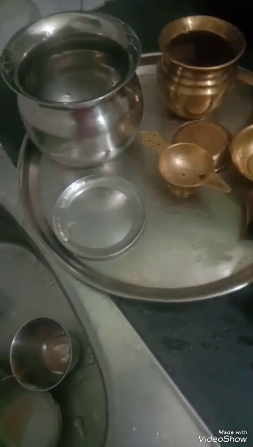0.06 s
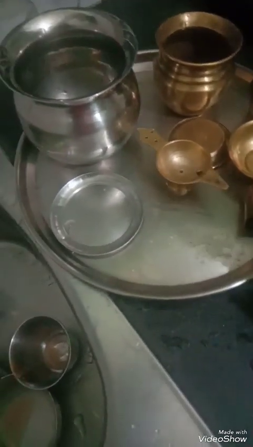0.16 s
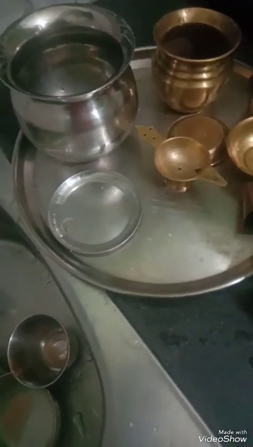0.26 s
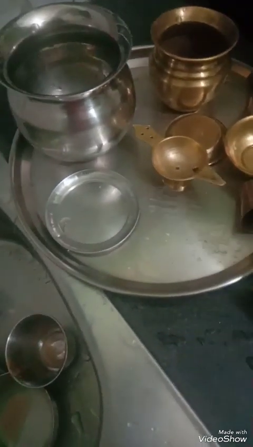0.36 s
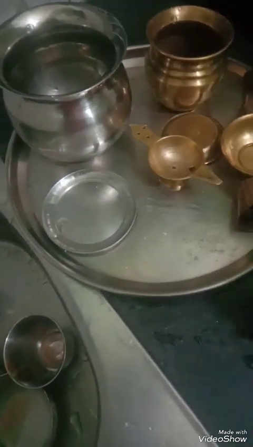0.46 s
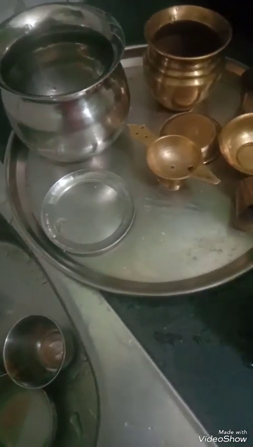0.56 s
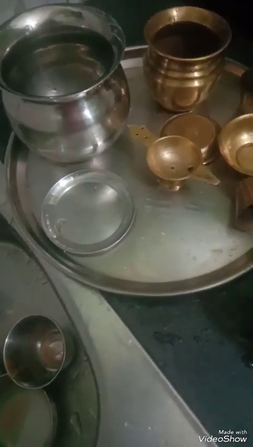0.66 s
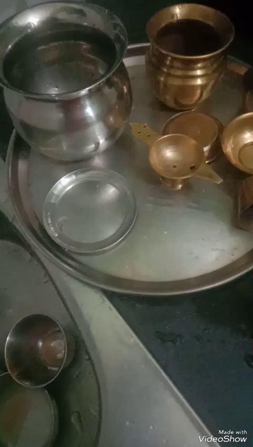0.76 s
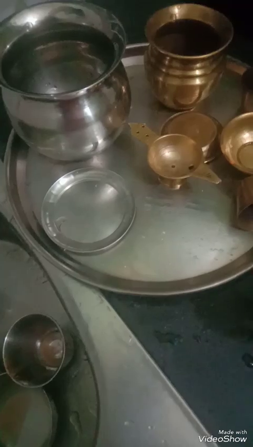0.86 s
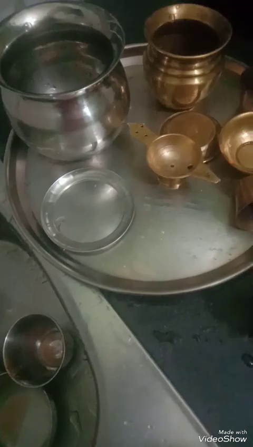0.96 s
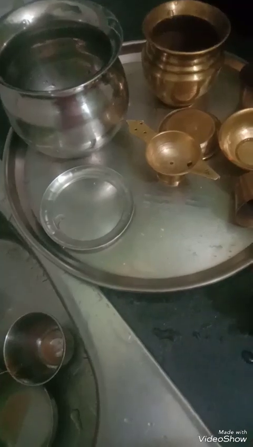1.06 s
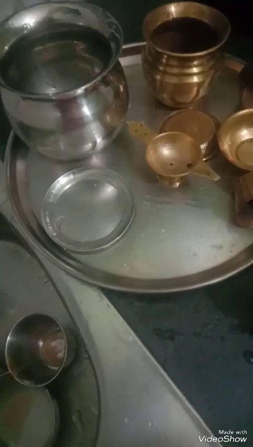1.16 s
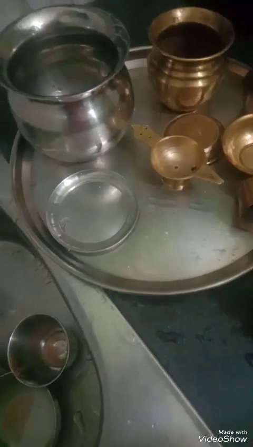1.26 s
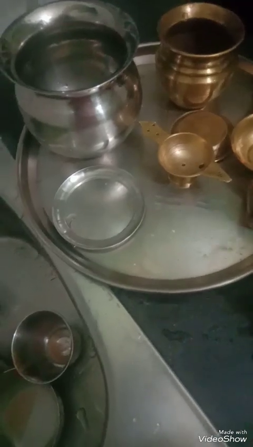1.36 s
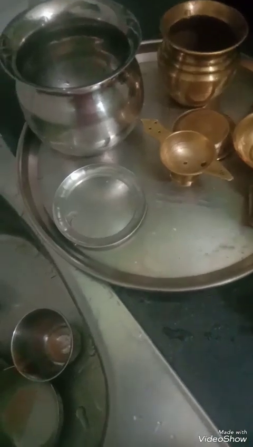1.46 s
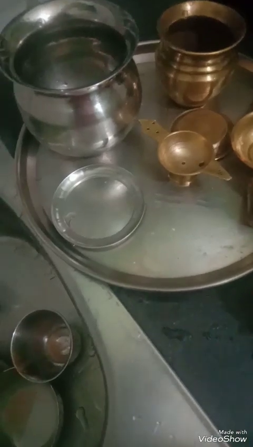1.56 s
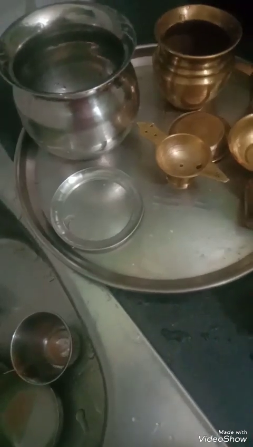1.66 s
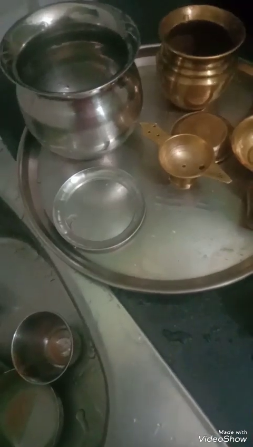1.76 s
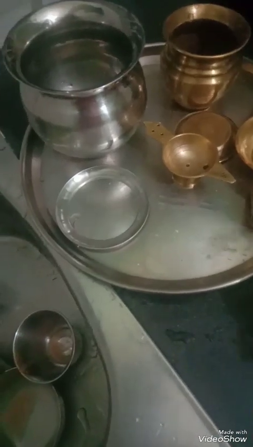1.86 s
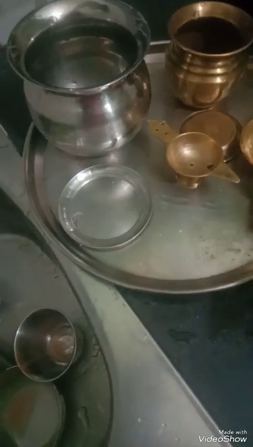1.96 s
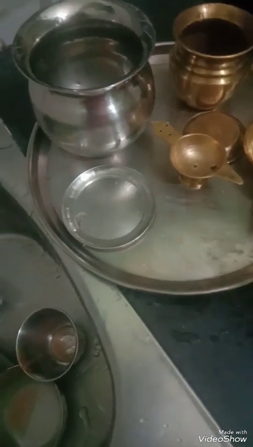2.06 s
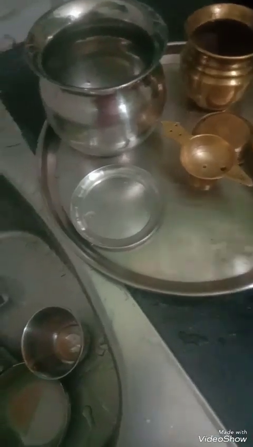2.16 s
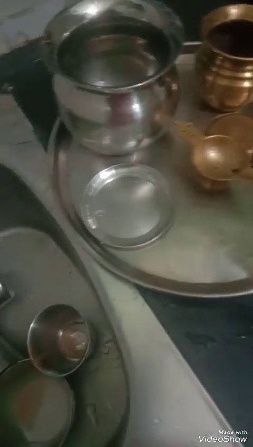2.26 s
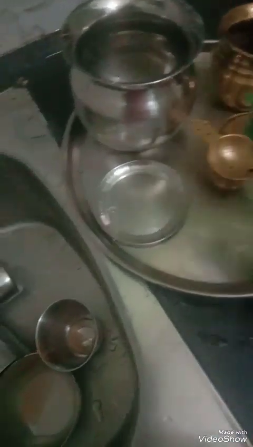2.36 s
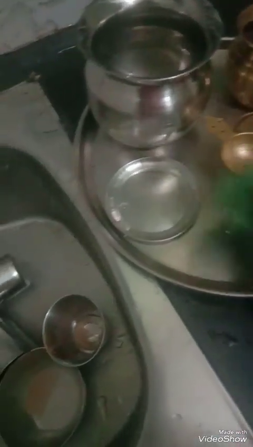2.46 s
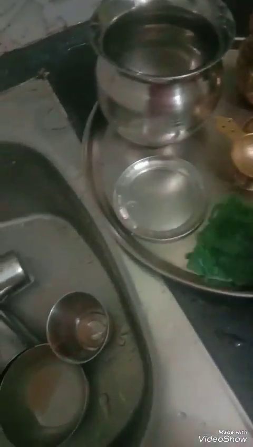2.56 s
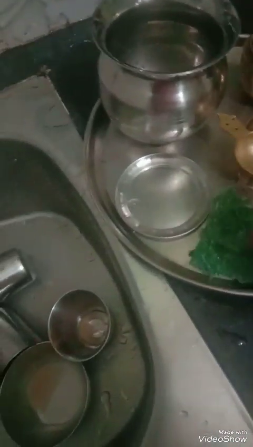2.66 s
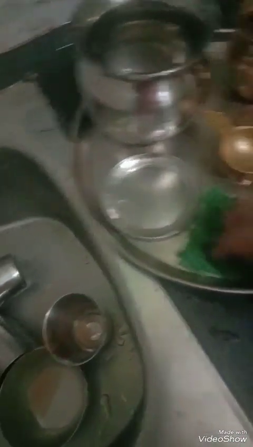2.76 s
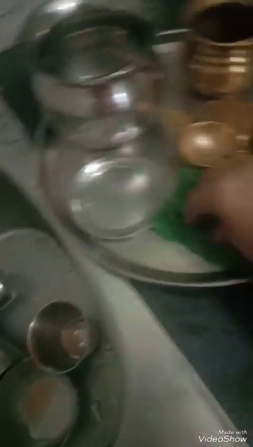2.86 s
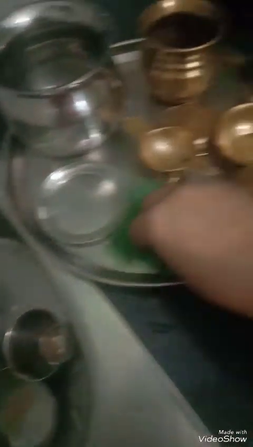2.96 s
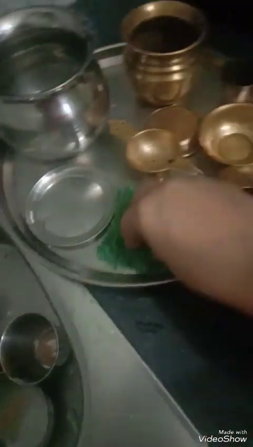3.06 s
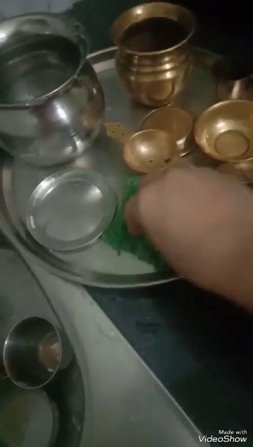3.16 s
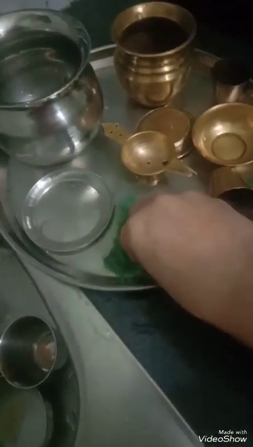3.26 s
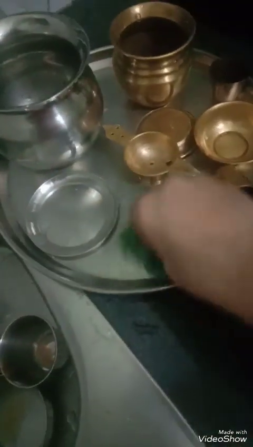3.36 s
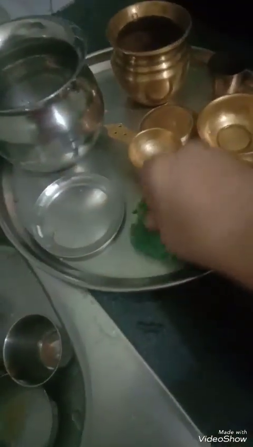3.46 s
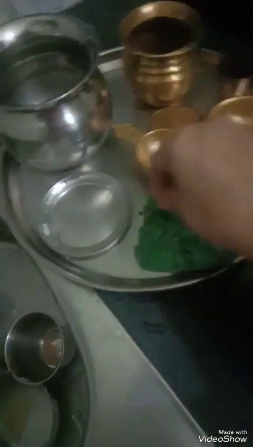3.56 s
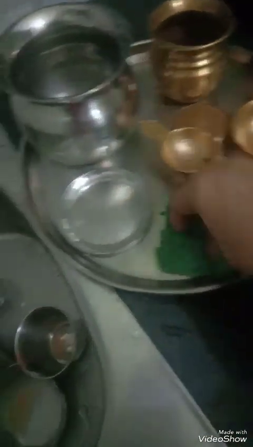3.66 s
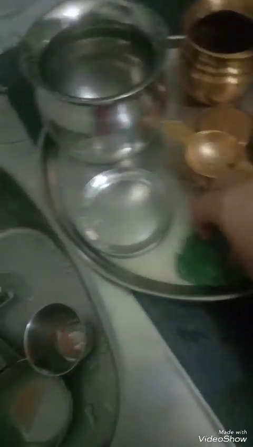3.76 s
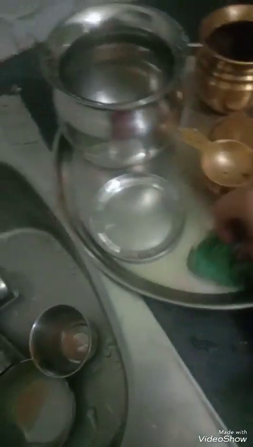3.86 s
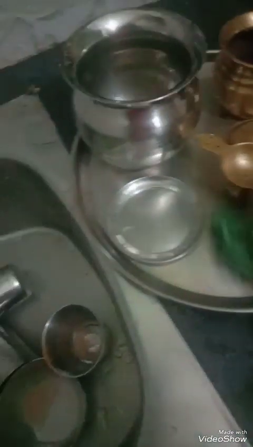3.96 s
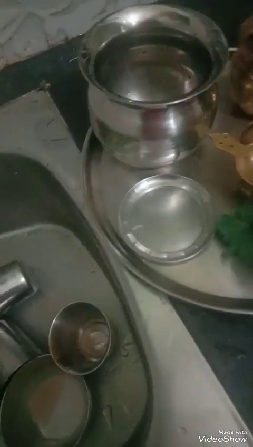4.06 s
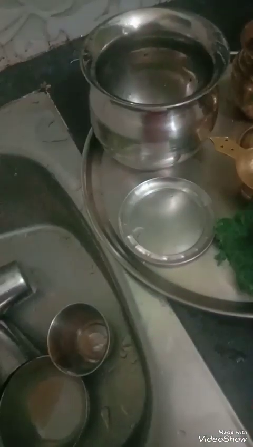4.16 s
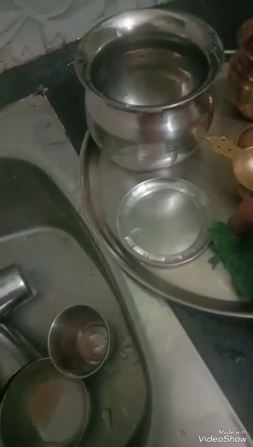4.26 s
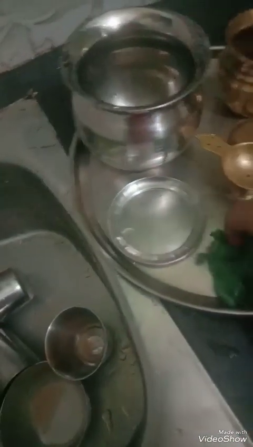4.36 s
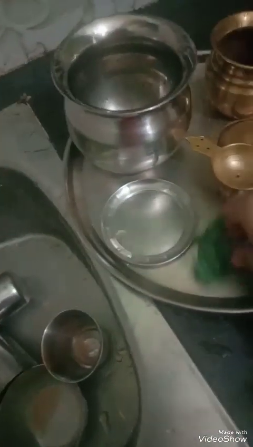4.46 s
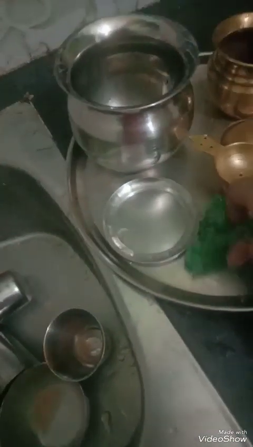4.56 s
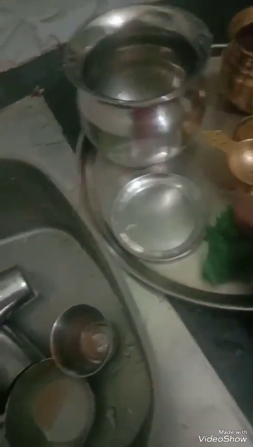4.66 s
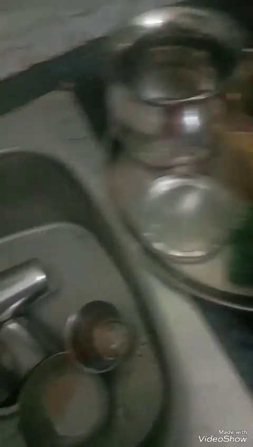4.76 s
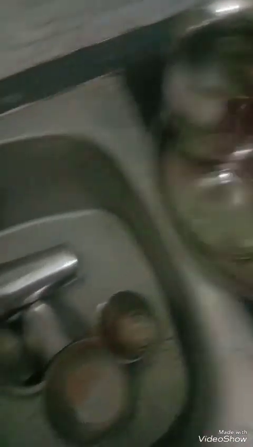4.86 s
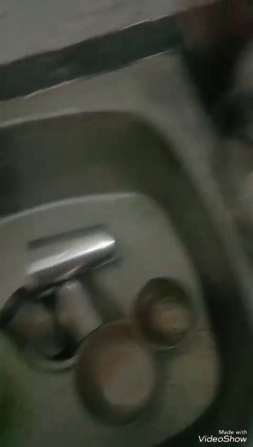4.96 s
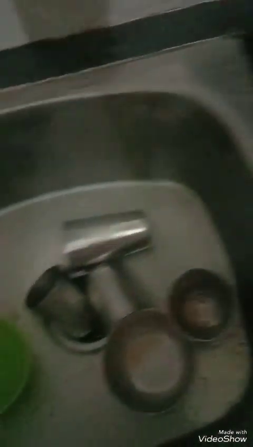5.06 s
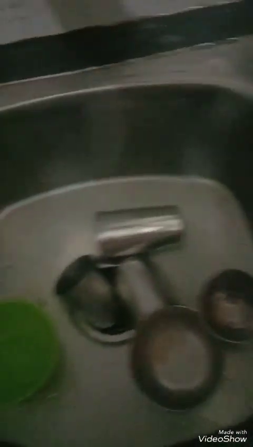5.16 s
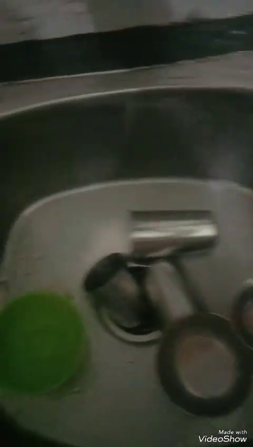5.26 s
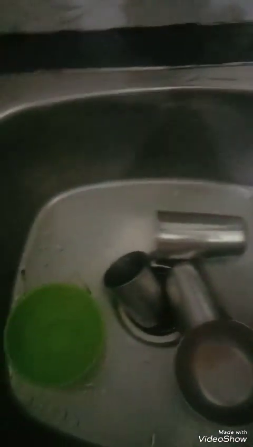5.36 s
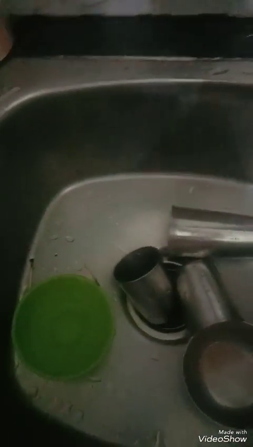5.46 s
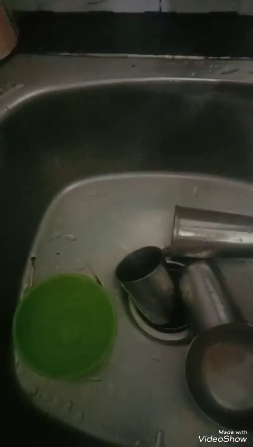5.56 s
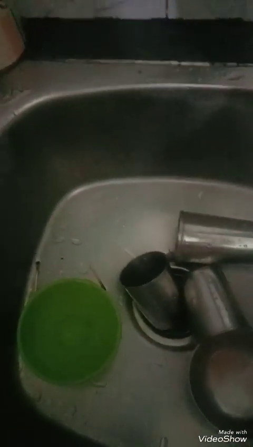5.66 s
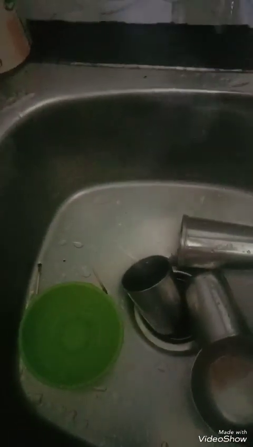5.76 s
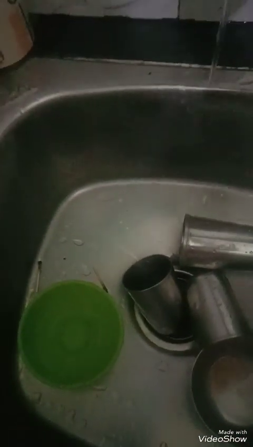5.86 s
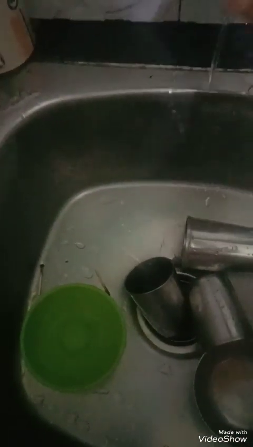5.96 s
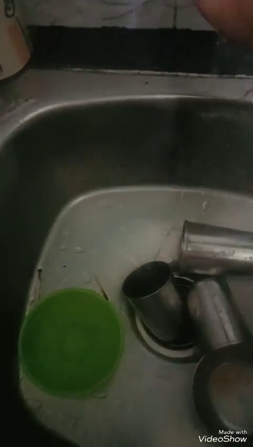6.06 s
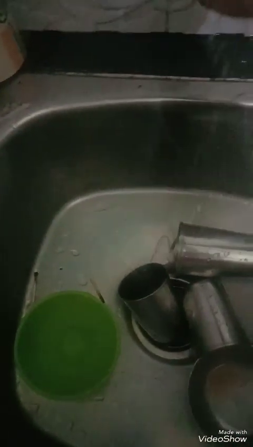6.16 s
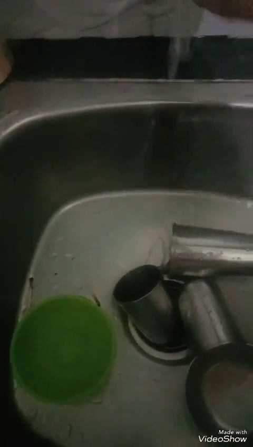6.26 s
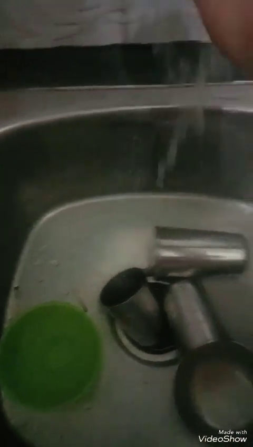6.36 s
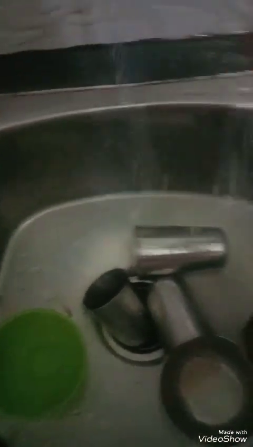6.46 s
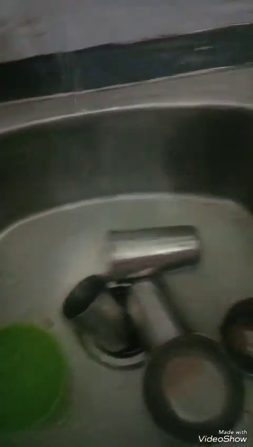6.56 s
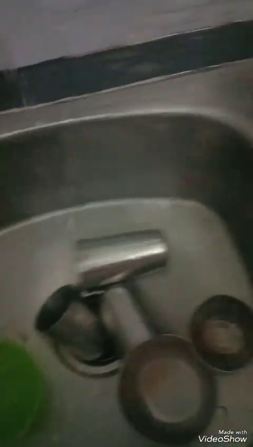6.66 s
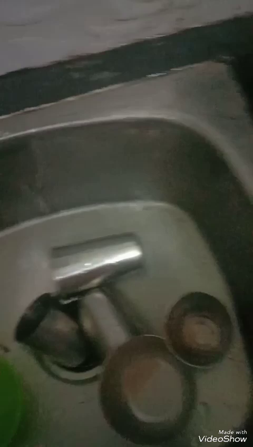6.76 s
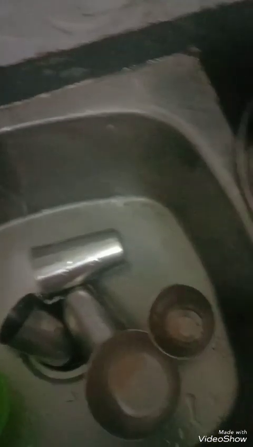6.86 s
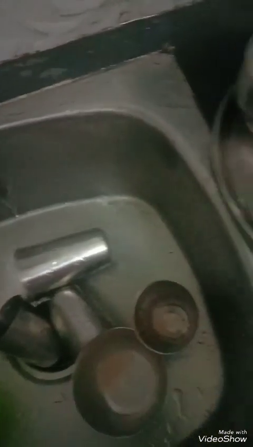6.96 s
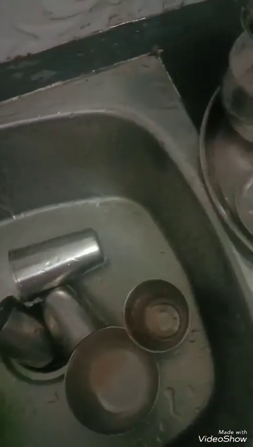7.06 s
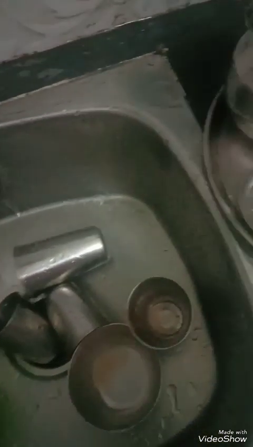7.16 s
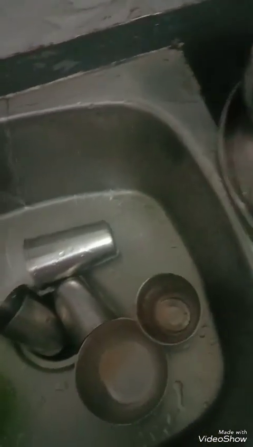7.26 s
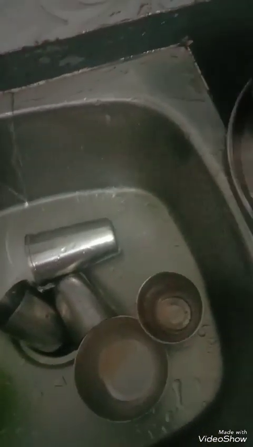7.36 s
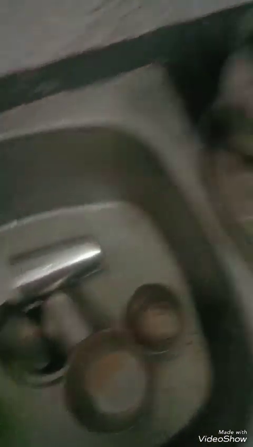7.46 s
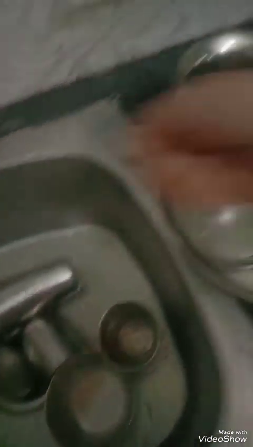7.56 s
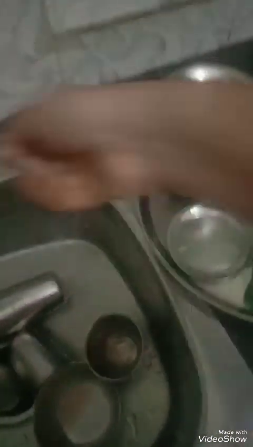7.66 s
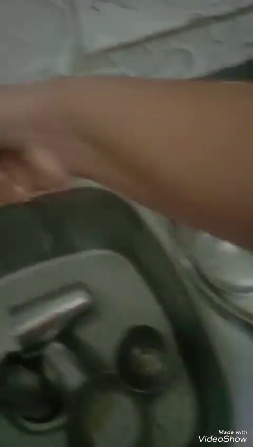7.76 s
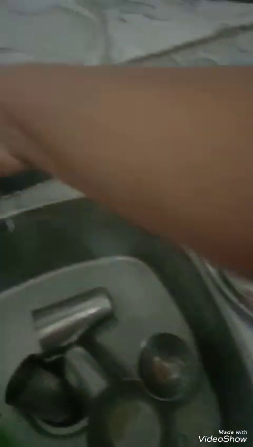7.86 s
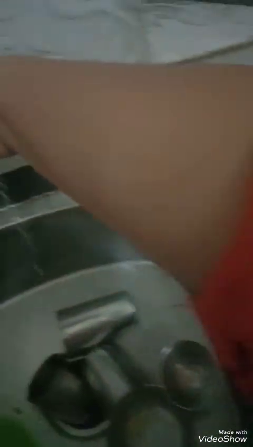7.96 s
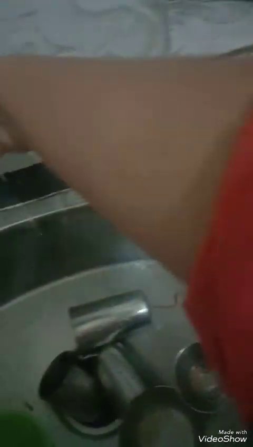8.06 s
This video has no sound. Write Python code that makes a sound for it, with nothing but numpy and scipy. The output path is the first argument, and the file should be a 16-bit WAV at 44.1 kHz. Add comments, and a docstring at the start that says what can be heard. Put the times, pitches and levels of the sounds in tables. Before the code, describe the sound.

Over a low room rumble and faint hiss, soft rubs and a couple of dull vessel knocks come first. A wet scouring pad then scrubs a steel tray in short, forceful strokes, making it ring and softly boom. After scrubbing stops, an object slides, a small utensil clatters, and a steel cup is lightly touched as a sleeve brushes past. One close microphone, identical in both channels, small tiled kitchen.

```python
"""A low room rumble and faint hiss come first, with a brief hum, then soft rubs, dull knocks and small ticks.
A wet scouring pad then scrubs a steel tray by a kitchen sink: its fibres slip, and the tray rings and booms.
Later come a slide, a short clatter, touches of a steel cup and the brush of a sleeve.
Random slips, collisions and noise play through resonant bodies; a tiled room adds its tail to most of them."""
import sys
import numpy as np
from scipy import signal
from scipy.fft import rfft, irfft, next_fast_len
from scipy.io import wavfile

SR = 44100
rng = np.random.default_rng(int(sys.argv[2]) if len(sys.argv) > 2 else 0)


def waveform_to_disk(signal):
    """Save audio, clipped to [-1, 1], as 16-bit WAV at the path in sys.argv[1]."""
    frames = np.transpose(np.atleast_2d(signal))
    scaled = np.clip(frames, -1, 1) * 32767
    samples = np.round(scaled).astype(np.int16)
    wavfile.write(sys.argv[1], SR, samples)


N = 357651
TIME = np.arange(N) / SR   # seconds


def from_db(db):
    """Turn decibels into gain."""
    return 10 ** (np.asarray(db) / 20)


def rms_one(x):
    """Scale a sound to an average strength (rms) of 1."""
    return x / np.sqrt(np.mean(x ** 2) + 1e-20)


def at_hz(points, hz):
    """Read a table between its points, with pitch on a log scale."""
    points = np.array(points)
    return np.interp(np.log(np.maximum(hz, 1)), np.log(points[:, 0]), points[:, 1])


def drift(rate):
    """Smooth random wandering with spread 1, changing about rate times a second."""
    # worked out at every 20th sample; the first 2000 values let the smoothing settle
    pole = np.exp(-40 * np.pi * rate / SR)
    steps = rng.standard_normal(N // 20 + 2002)
    slow = signal.lfilter([1], [1, -2 * pole, pole * pole], steps)[2000:]
    return np.interp(np.arange(N) / 20, np.arange(len(slow)), rms_one(slow))


def response(colour, modes=(), size=16384):
    """How a body answers one sharp tap: broad colour plus resonances, with energy 1."""
    hz = np.arange(size // 2 + 1) * SR / size
    db = at_hz(colour, hz)
    for centre, width, lift in modes:
        db = db + lift / (1 + (2 * (hz - centre) / width) ** 2)
    # folding the cepstrum makes the answer start at once (minimum phase)
    cepstrum = irfft(np.log(from_db(db)))[:size // 2]
    cepstrum[1:] *= 2
    ring = irfft(np.exp(rfft(cepstrum, size)))[:size // 2]
    return ring / np.sqrt(np.sum(ring ** 2))


def through(x, ring):
    """Let a force play through a body's answer."""
    return signal.oaconvolve(x, ring)[:len(x)]


def add(track, s, sound):
    """Mix a sound in at a time in seconds."""
    start = max(round(s * SR), 0)
    track[start:start + len(sound)] += sound[:N - start]


def contact(decay_s, hold_s=0., size=8192):
    """A burst of tiny collisions that holds briefly and dies away; rms 1 at its start."""
    t = np.arange(size) / SR
    shape = np.exp(-np.maximum(t - hold_s, 0) / decay_s)
    burst = rms_one(rng.standard_normal(size) * shape)
    return burst * np.sqrt(np.mean(shape ** 2))


def grains(per_s, spread_db):
    """Random slips of uneven size and either sign; rms 1."""
    sizes = from_db(spread_db * np.minimum(rng.exponential(1, N), 4)) * rng.choice([-1, 1], N)
    happens = rng.random(N) < per_s / SR
    # where slips are denser, each one is smaller
    return rms_one(sizes * happens / np.sqrt(per_s))


def roam(force, roam_db, roam_rate):
    """Each pitch band swells and sinks by itself, so the colour keeps shifting."""
    size = next_fast_len(N)
    spectrum, hz = rfft(force, size), np.arange(size // 2 + 1) * SR / size
    edges = [0, *np.geomspace(420, 8000, 13), SR]
    total = np.zeros(N)
    for low, high in zip(edges, edges[1:]):
        band = irfft(spectrum * (hz >= low) * (hz < high), size)[:N]
        total += band * from_db(roam_db * drift(roam_rate))
    return total


def tone(force, treble_db, bass_db=0., treble_hz=2400, bass_hz=800):
    """Raise or lower the treble and bass of a force against its middle."""
    body = signal.sosfilt(signal.butter(1, treble_hz, fs=SR, output="sos"), force)
    bass = signal.sosfilt(signal.butter(1, bass_hz, fs=SR, output="sos"), force)
    top, bottom = from_db(treble_db), from_db(bass_db)
    shaped = body + top * (force - body) + (bottom - 1) * bass
    # offset most of the change in loudness
    return shaped / np.sqrt(.5 + 0.28 * top ** 2 + 0.24 * bottom ** 2)


def push(s, length, attack_s, fall_db_per_s):
    """A straight rise, a hold and an even fall in dB."""
    rise = np.clip((TIME - s) / attack_s, 0, 1)
    fall_db = np.minimum(fall_db_per_s * np.maximum(TIME - s - length, 0), 200)
    return rise * from_db(-fall_db)


SWELL_EDGE_DB = -10.5   # a swell is this far down at either end of its length


def swells(rows):
    """Smooth bell-shaped rises and falls of level."""
    total = np.zeros(N)
    for middle, length, db in rows:
        distance = np.minimum((2 * (TIME - middle) / length) ** 2, 20)
        total += from_db(db + SWELL_EDGE_DB * distance)
    return total


# how long the kitchen's tail takes to fall by 60 dB: (f/Hz, time/s)
KITCHEN_DECAY = [(100, 0.25), (260, 0.29), (700, 0.48), (1840, 0.33), (4850, 0.29), (14000, .22)]


def kitchen(x, wet_db, size=26000):
    """Tiled walls return a dense tail whose decay time differs from bass to treble."""
    t, hz = np.arange(size) / SR, np.arange(size // 2 + 1) * SR / size
    noise, tail = rfft(rng.standard_normal(size)), np.zeros(size)
    edges = np.geomspace(40, 20480, 10)
    for low, high in zip(edges, edges[1:]):
        band = irfft(noise * (hz >= low) * (hz < high), size)
        tail += band * .001 ** (t / at_hz(KITCHEN_DECAY, np.sqrt(low * high)))
    # the tail starts a moment after the direct sound and builds up
    tail = tail * np.clip(t / 0.0077 - .5, 0, 1)
    return x + from_db(wet_db) * through(x, tail / np.sqrt(np.sum(tail ** 2)))


# swells of the room's low rumble: (middle t/s, length/s, relative level/dB)
RUMBLE_SURGES = [(.28, .12, -58), (1.32, 0.16, -51.5), (1.68, 0.056, -55), (1.93, 0.079, -48),
                 (2.1, 0.17, -53.5), (5.75, 0.082, -52.5), (5.93, 0.079, -52), (6.5, 0.36, -51)]
# broad colour of the room sound: (f/Hz, relative level per Hz/dB)
AIR_COLOUR = [(20, -32.5), (45, -17.5), (80, -0.5), (150, 2.5), (260, -22), (420, -16), (600, -19.5),
              (1200, -26), (1600, -30.5), (2400, -32.5), (5000, -35), (7400, -31), (8400, -43),
              (16000, -48)]
# resonances of the room sound: (f/Hz, width/Hz, lift/dB)
AIR_MODES = [(141, 80, 3), (394, 35, 6.6), (1140, 60, 6.3), (1257, 87, 15), (5690, 660, 13.2)]
HISS_DB = -57
RUMBLE_DB, RUMBLE_WAVER_DB, RUMBLE_WAVER_PER_S = -60, 3, 4.3


def room_tone(rumble_hz=260, waver_db=2.64):
    """Coloured noise splits into a surging rumble and a faint hiss whose colour wavers."""
    air = through(rng.standard_normal(N), response(AIR_COLOUR, AIR_MODES))
    low_pass = signal.butter(3, rumble_hz, fs=SR, output="sos")
    rumble = signal.sosfiltfilt(low_pass, air)
    steady = from_db(RUMBLE_DB + RUMBLE_WAVER_DB * drift(RUMBLE_WAVER_PER_S))
    surge = np.hypot(steady, swells(RUMBLE_SURGES))
    hiss = roam(air - rumble, roam_db=waver_db, roam_rate=4)
    return surge * rumble + from_db(HISS_DB) * hiss


# the hum comes and goes: (middle t/s, length/s, level/dB)
HUM_SWELLS = [(.28, .42, -62.5)]
# resonance of the hum: (f/Hz, width/Hz, lift/dB)
HUM_RESONANCE = [(418, 66, 19)]


def hum():
    """Noise through one narrow resonance makes a faint, wavering tone."""
    ring = response([(100, -30), (420, 0), (1500, -40), (16000, -90)], HUM_RESONANCE)
    return swells(HUM_SWELLS) * through(rng.standard_normal(N), ring)


def light_friction():
    """Many small random slips with a shifting colour, shared by all the soft rubbing sounds."""
    return rms_one(roam(grains(5000, spread_db=3.5), roam_db=4.0, roam_rate=22))


# the pad is first rubbed softly, away from the tray: (middle t/s, length/s, level/dB)
PAD_RUBS = [(.59, 0.22, -59.5), (.94, 0.29, -59.5), (1.33, 0.18, -62), (1.64, 0.32, -59.5)]
# broad colour of the soft rubs: (f/Hz, relative level per Hz/dB)
PAD_RUB_COLOUR = [(400, -17), (1100, 16), (1600, -0.5), (2400, -2.5), (3200, 2.5), (4300, 1.5),
                  (5100, -3.5), (6100, 5), (7300, 6), (8700, -13.5), (10000, -20), (16000, -42)]


def soft_rubs(friction):
    """Gentle swells of friction take the colour of the soft rubs."""
    return swells(PAD_RUBS) * through(friction, response(PAD_RUB_COLOUR))


# dull knocks of vessels: (t/s, relative level/dB, main f/Hz, build-up/s)
VESSEL_KNOCKS = [(0.574, -27.5, 1180, 0.00094), (0.620, -20, 1107, .001), (1.752, -27, 870, .014),
                 (1.785, -37, 885, .008), (6.230, -43, 900, .004), (6.390, -35, 680, .009),
                 (6.541, -24, 930, 0.0041), (6.598, -35.5, 837, 0.00335), (7.745, -47, 619, 0.0029)]
# broad colour of a knock: (f/Hz, relative level per Hz/dB)
VESSEL_COLOUR = [(100, -52), (280, -14), (480, -6.5), (750, -12.5), (1300, -1.5), (1550, -17), (2500, -27),
                 (3500, -45), (6000, -60), (16000, -72)]


def knocks(knock_db=-6.5, width_hz=300, lift_db=10, bump_db=14):
    """A single push amid a short jiggle that builds up gently sounds one damped main resonance."""
    out = np.zeros(N)
    for s, db, hz, build_s in VESSEL_KNOCKS:
        force = contact(decay_s=0.0077, hold_s=0.0016)
        force = force * (1 - np.exp(-TIME[:len(force)] / build_s))
        add(force, min(build_s, .05), from_db([bump_db]))
        ring = response(VESSEL_COLOUR, [(hz, width_hz, lift_db)])
        add(out, s, from_db(db + knock_db) * through(force, ring))
    return out


# light ticks around the sink: (t/s, relative level/dB, f/Hz)
SINK_TICKS = [(1.4514, -60.5, 5600), (5.268, -64, 1658), (5.3146, -61.5, 1658), (6.0258, -59.5, 4024),
              (6.319, -56.5, 7540), (6.642, -55.5, 4440), (6.8464, -46.5, 2920), (6.875, -58, 2850),
              (6.901, -52, 4500), (7.414, -60, 4660), (7.9553, -60, 4350)]
# broad colour of ticks, also used for the cup: (f/Hz, relative level per Hz/dB)
SMALL_COLOUR = [(300, -40), (1200, 10.5), (3000, -5.5), (7500, 4), (9000, -12.5), (16000, -26)]


def ticks(tick_db=9.5, width_hz=700, lift_db=23, lower_ratio=0.766, lower_db=19):
    """Tiny contacts, each with a short ring of two resonances of its own."""
    out = np.zeros(N)
    for s, db, hz in SINK_TICKS:
        modes = [(hz, width_hz, lift_db), (hz * lower_ratio, width_hz / 2, lower_db)]
        ring = response(SMALL_COLOUR, modes, size=4096)
        add(out, s, from_db(db + tick_db) * through(contact(decay_s=0.0031), ring))
    return out


PRESS_S, RELEASE_DB_PER_S = 0.0077, 298.5   # the pad bites quickly and lets go fast
RUN_OUT_DB = -9.5   # then it runs out lightly, this far under the push
APPROACH_DB, APPROACH_DB_PER_S = -15, 423   # a light graze peaks as the pad lands


def stroke(s, length, run_out_db_per_s):
    """Pressure through one stroke: a graze, the push, a quick release and a light run-out."""
    graze = from_db(APPROACH_DB - APPROACH_DB_PER_S * np.minimum(np.abs(TIME - s), .5))
    firm = push(s, length, PRESS_S, RELEASE_DB_PER_S)
    run_out = from_db(RUN_OUT_DB) * push(s, length, PRESS_S, run_out_db_per_s)
    return np.maximum(firm, np.maximum(graze, run_out))


# strokes of the pad; levels and shares are relative: (start t/s, push length/s, rubbing level/dB,
# treble share/dB, bass share/dB, run-out fall/dB per s, landing level/dB, boom level/dB)
PAD_STROKES = [ (2.483, 0.011, -41, -4.5, -21, 91.5, -32, -60),
               (2.739, 0.038, -19, 5, -1.5, 137, -7.5, -43),
               (2.924, 0.019, -36.5, 5.5, -6, 127, -28.5, -60),
               (3.021, 0.077, -45.5, 13.5, 3, 61.5, -54, -54), (3.148, 0.094, -42, 11, 0, 80, -53.5, -57),
               (3.21, 0.05, -25, -11, -11.5, 72.5, -14, -49),
               (3.413, 0.047, -20.5, -11.5, -21, 90, -15, -40.5),
               (3.544, 0.006, -30.5, -6, -15.5, 170, -17, -49),
               (3.641, 0.085, -20.5, -2.5, -10.5, 48, -7.5, -43.5),
               (3.883, .030, -36, 0, -10.5, 80, -55, -49), (3.914, 0.057, -19, -3.5, -17, 77.5, -16, -44),
               (4.221, 0.059, -21.5, -4.5, -13.5, 80.5, -6.5, -39),
               (4.478, 0.043, -20.5, -1, -15, 90, -10.5, -44.5),
               (4.614, 0.14, -19.5, -3.5, -17, 114.5, -5, -38.5),
               (4.999, 0.013, -43, -1.5, -8.5, 111.5, -29.5, -47), ]
# the pad snags on the tray: (t/s, relative level/dB, relative treble share/dB)
PAD_SNAGS = [(2.548, -30.5, -32), (2.658, -38, -26), (2.728, -35, 3.5), (3.133, -28.5, -28),
             (3.233, -13.5, -18.5), (3.446, -19.5, -15.5), (3.511, -21, -32), (3.676, -9.5, -23),
             (3.949, -6.5, -11.5), (4.246, -15, -5), (4.4, -27.5, -6.5), (4.462, -22, -14),
             (4.645, -13.5, 8)]
# broad colour of pad on tray: (f/Hz, relative level per Hz/dB)
SCRUB_COLOUR = [(60, -21.5), (250, -15), (500, -9.5), (850, -7.5), (1200, -1), (1700, -3), (2000, -9),
                (4000, -12), (6500, -10), (7400, -5.5), (8500, -21), (11000, -32), (13500, -39),
                (16000, -31)]
# resonances of the steel tray: (f/Hz, width/Hz, lift/dB)
TRAY_RESONANCES = [(493, 9.1, 5), (538, 52, 5), (623, 38, 3), (731, 39, 3), (1160, 40, 0.5),
                   (1284.6, 114, 12), (1370, 43, 5.5), (1340, 28, -3), (1527, 25, 5), (1553, 56, 2.5),
                   (1666, 30, 4.5), (1810, 27, 2), (2162, 42, 9), (2310, 67, 3.5), (2580, 100, 3),
                   (2738, 130, 6), (3770, 76, 0.5), (4030, 540, 6.5), (4550, 50, 2.5), (4880, 100, 4.5),
                   (4980, 120, -6), (5060, 60, 1.5), (5300, 50, 3.5), (5700, 22, 2), (6040, 70, 4.5),
                   (6400, 140, 5), (6960, 120, 4)]
LANDING_TREBLE_DB = -9.5   # a landing is duller than its stroke
LANDING_BASS_DB = 10   # added to the stroke table's bass share


def scrubbing(rasp_db=-1.5, landing_db=-9, snag_db=-10.5, treble_db=6.0, bass_db=14.5,
              snag_bass_db=-2.5, light_per_s=1200, firm_per_s=8000, chatter_db=2.5):
    """Fibres slip more densely under pressure; slips, landings and snags all ring the tray."""
    start, length, level, treble, bass, run_out, landing, _ = np.transpose(PAD_STROKES)
    each = np.array([from_db(db) * stroke(s, hold, fall)
                     for s, hold, db, fall in zip(start, length, level, run_out)])
    # at every moment the strongest stroke sets pressure and tone
    pressure, current = each.max(axis=0), each.argmax(axis=0)
    slips = grains(light_per_s + firm_per_s * pressure / pressure.max(), spread_db=0.5)
    slips = roam(slips, roam_db=2.5, roam_rate=9.4)
    # fast random chatter gathers the slips in clumps
    slips = rms_one(slips * from_db(chatter_db * drift(130)))
    rasp = tone(slips, treble[current] + treble_db, bass[current] + bass_db)
    force = from_db(rasp_db) * pressure * rasp
    for s, db, bright, deep in zip(start, landing, treble + LANDING_TREBLE_DB, bass + LANDING_BASS_DB):
        hit = tone(contact(decay_s=0.0036, hold_s=0.005), bright + treble_db, deep)
        add(force, s, from_db(db + landing_db) * hit)
    for s, db, bright in PAD_SNAGS:
        snag = tone(contact(decay_s=0.006, hold_s=0.0044), bright + treble_db, snag_bass_db)
        add(force, s, from_db(db + snag_db) * snag)
    return through(force, response(SCRUB_COLOUR, TRAY_RESONANCES))


# broad colour of the tray's boom: (f/Hz, relative level per Hz/dB)
TRAY_BOOM_COLOUR = [(25, -19), (50, -5), (90, 6.5), (150, 9.5), (220, -16.5), (400, -48.5)]
# the tray's low resonance: (f/Hz, width/Hz, lift/dB)
TRAY_BOOM_MODES = [(136.8, 7.8, 13)]
FLEX_S, FLEX_DB_PER_S = 0.019, 36   # the tray gives under the hand and settles slowly


def tray_boom(boom_db=-1.5):
    """Noise through the tray's low resonance rises and falls with each push of the hand."""
    flexes = [from_db(db) * push(s, length, FLEX_S, FLEX_DB_PER_S)
              for s, length, *_, db in PAD_STROKES]
    flex = np.max(flexes, axis=0)
    boom = through(rng.standard_normal(N), response(TRAY_BOOM_COLOUR, TRAY_BOOM_MODES))
    return from_db(boom_db) * flex * boom


# something is slid along by hand: (middle t/s, length/s, relative level/dB)
HAND_SLIDES = [(6.11, 0.087, -49), (6.235, 0.033, -42.5), (6.44, 0.23, -44), (6.575, 0.057, -41.5),
               (7.92, 0.11, -66), (8.05, 0.11, -67)]
# broad colour of the slide: (f/Hz, relative level per Hz/dB)
HAND_SLIDE_COLOUR = [(150, -41), (450, -3), (650, 0.5), (900, 8), (1050, -9.5), (1280, 2.5), (1700, -16.5),
                     (3000, -19.5), (7000, -21), (9000, -38), (16000, -57)]


def slides(friction, slide_db=-2.5):
    """Swells of light friction take the dull colour of an object slid along."""
    return from_db(slide_db) * swells(HAND_SLIDES) * through(friction, response(HAND_SLIDE_COLOUR))


# a small utensil clatters: (t/s, relative level/dB, relative thud level/dB, treble share/dB)
UTENSIL_STRIKES = [(6.2402, -39.5, -52, 23), (6.4169, -29, -37.5, 7), (6.445, -19.5, -33.5, -18),
                   (6.554, -37.5, -42, 7)]
# broad colour of the strikes: (f/Hz, relative level per Hz/dB)
UTENSIL_COLOUR = [(500, -14), (1500, -8), (3000, -8.5), (7000, 5), (9000, -1), (13000, -11), (16000, -7)]
# resonances of the utensil: (f/Hz, width/Hz, lift/dB)
UTENSIL_RESONANCES = [(2840, 170, 17), (4100, 130, 10), (4400, 220, 21), (5090, 78, 6.5), (5400, 120, 6.5),
                      (5670, 93, 9.1), (6260, 54, 7.8), (6900, 70, 10), (7130, 130, 14)]
# broad colour of the thuds: (f/Hz, relative level per Hz/dB)
LANDING_THUD_COLOUR = [(50, -42), (140, 13), (280, -1), (900, -0.5), (1300, -2), (2000, -8), (6000, -32)]


def clatter(strike_db=10, rattle_db=-8, thud_db=-3.0, edge_hz=7000):
    """A hard strike and brief rattle ring a small utensil, which thuds into what it lands on."""
    sharp, blunt = np.zeros((2, N))
    for s, db, thud, treble in UTENSIL_STRIKES:
        strike = from_db(rattle_db) * contact(decay_s=0.0037, hold_s=0.0034)
        strike[0] += from_db(strike_db)
        add(sharp, s, from_db(db) * tone(strike, treble, treble_hz=edge_hz))
        add(blunt, s, from_db(thud + thud_db) * contact(decay_s=0.022))
    ringing = through(sharp, response(UTENSIL_COLOUR, UTENSIL_RESONANCES))
    return ringing + through(blunt, response(LANDING_THUD_COLOUR))


# a steel cup is touched: (t/s, relative level/dB)
CUP_TOUCHES = [(7.337, -39.5), (7.4645, -36.5), (7.7427, -46), (7.9752, -52), (8.0653, -43)]
# resonances of the cup: (f/Hz, width/Hz, lift/dB)
CUP_RESONANCES = [(2270, 80, 18.5), (2840, 170, 17.5), (3320, 110, 20), (3933, 140, 16.5), (4540, 240, 21),
                  (5150, 160, 17), (5580, 150, 15), (6010, 170, 24), (6930, 160, 16), (7350, 140, 20),
                  (8600, 89, 18)]


def clinks(clink_db=-4.0):
    """Every touch is a short burst that rings the same resonances of the cup."""
    force = np.zeros(N)
    for s, db in CUP_TOUCHES:
        add(force, s, from_db(db + clink_db) * contact(decay_s=0.0038))
    return through(force, response(SMALL_COLOUR, CUP_RESONANCES))


# a sleeve brushes past: (middle t/s, length/s, relative level/dB)
SLEEVE_BRUSHES = [(7.52, 0.29, -61.5), (7.76, 0.13, -54.5)]
# broad colour of the cloth: (f/Hz, relative level per Hz/dB)
CLOTH_COLOUR = [(300, -1.5), (700, -3.5), (1200, 0), (2000, -26), (5000, -9.5), (6500, -9), (7400, 5),
                (8800, -12), (12000, -28), (16000, -21)]


def sleeve(friction, sleeve_db=-2.5):
    """Swells of light friction take the colour of brushing cloth."""
    return from_db(sleeve_db) * swells(SLEEVE_BRUSHES) * through(friction, response(CLOTH_COLOUR))


def scene():
    """Everything reaches one microphone, the same in both channels."""
    background = room_tone() + hum()
    friction = light_friction()
    rustles = soft_rubs(friction) + slides(friction) + sleeve(friction)
    tray = kitchen(scrubbing(), wet_db=-10.0) + tray_boom()
    vessels = kitchen(knocks(), wet_db=-9.5)
    small_sounds = kitchen(ticks() + clatter() + clinks() + rustles, wet_db=-5.5)
    return np.tile(background + tray + vessels + small_sounds, (2, 1))


# the microphone port's notch and resonance: (f/Hz, width/Hz, lift/dB)
PORT_MODES = [(6630, 210, -9.5), (15100, 3500, 11)]
PEAK_LIMIT = .46   # rounding keeps peaks below this, on a full scale of 1
CUTOFF_HZ = 15520


def record(dry):
    """The microphone port notches the treble and rings above it; peaks are rounded, the top is cut."""
    port = response([(20, 0), (20000, 0)], PORT_MODES, size=512)
    heard = np.array([through(channel, port / port.sum()) for channel in dry])
    rounded = heard / (1 + (heard / PEAK_LIMIT) ** 4) ** (1 / 4)
    top_cut = signal.ellip(12, .1, 80, CUTOFF_HZ, fs=SR, output="sos")
    return signal.sosfilt(top_cut, rounded)


dry = scene()
out = record(dry)
waveform_to_disk(out)
```